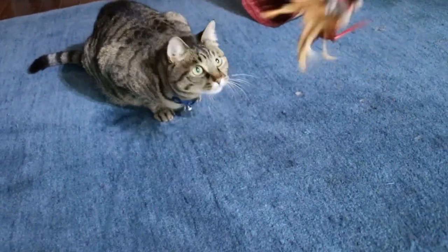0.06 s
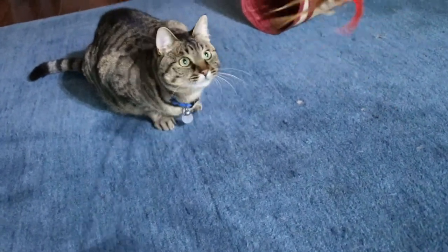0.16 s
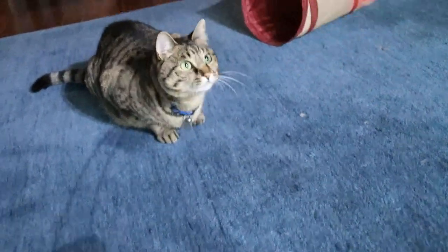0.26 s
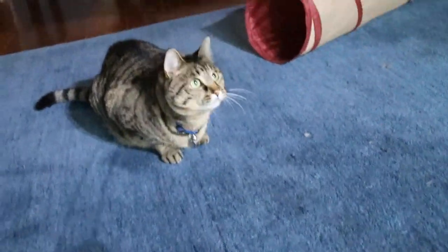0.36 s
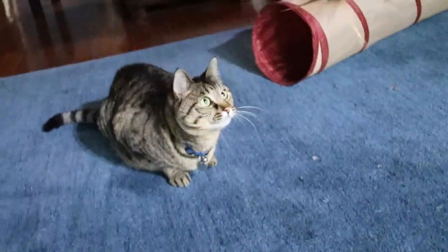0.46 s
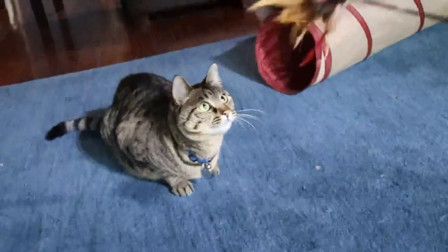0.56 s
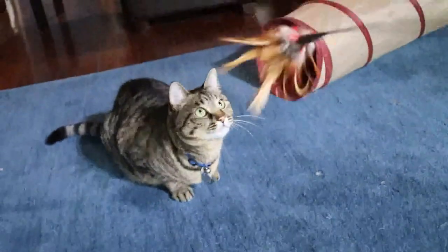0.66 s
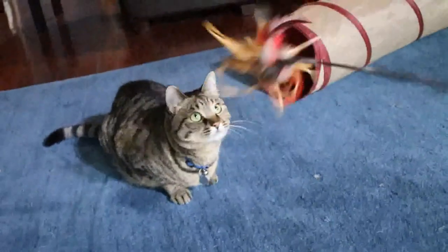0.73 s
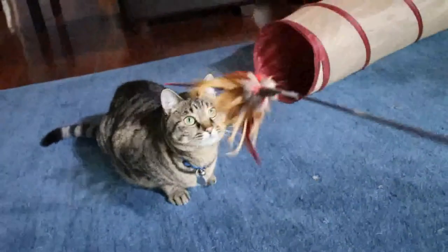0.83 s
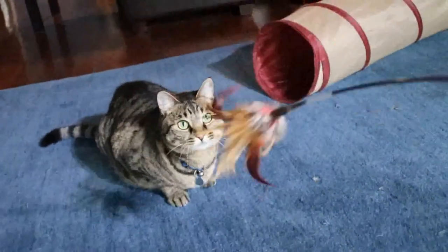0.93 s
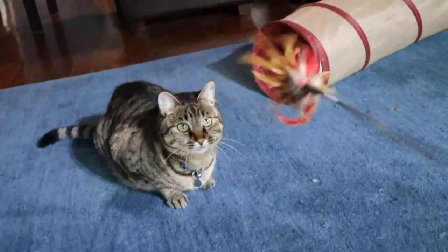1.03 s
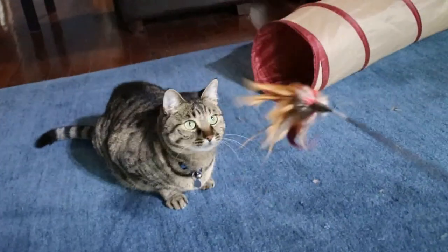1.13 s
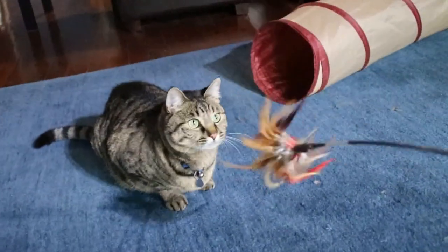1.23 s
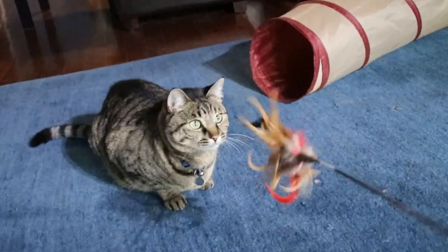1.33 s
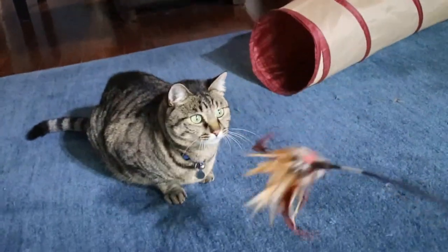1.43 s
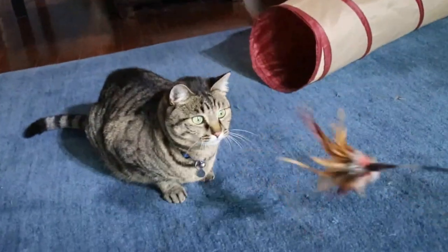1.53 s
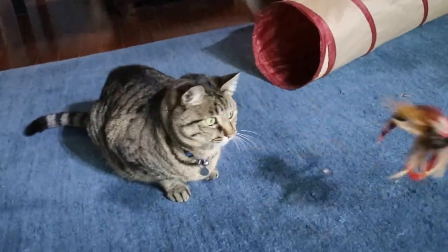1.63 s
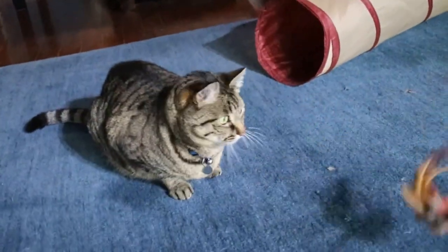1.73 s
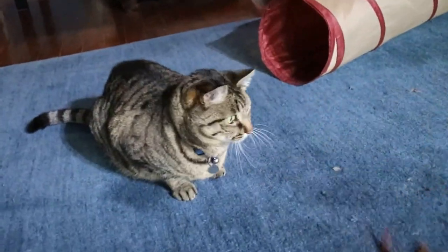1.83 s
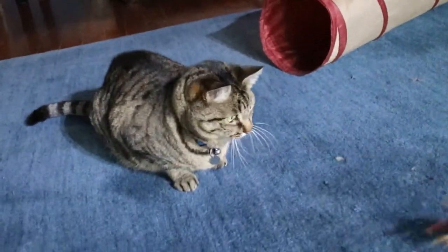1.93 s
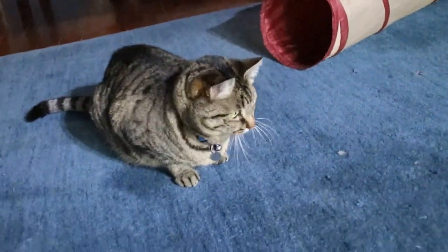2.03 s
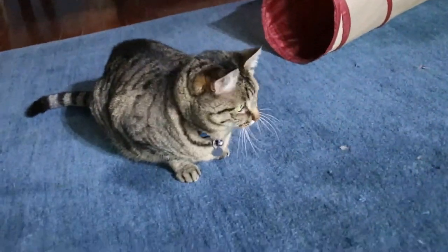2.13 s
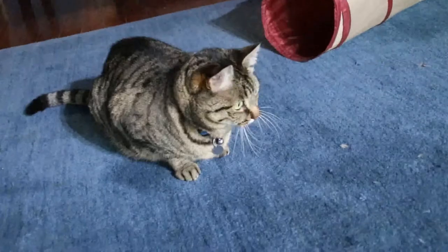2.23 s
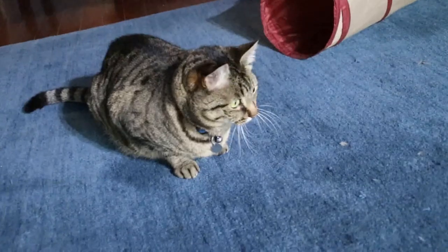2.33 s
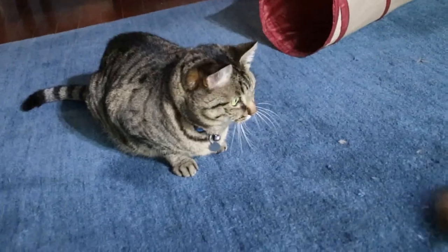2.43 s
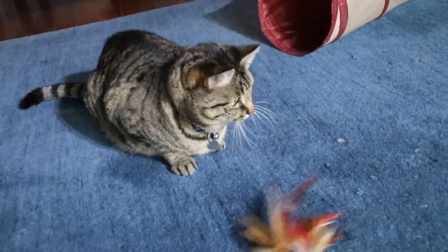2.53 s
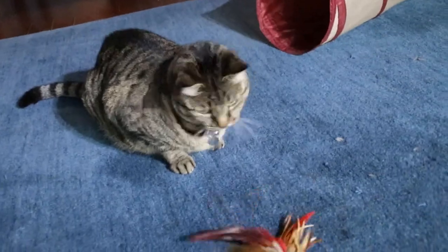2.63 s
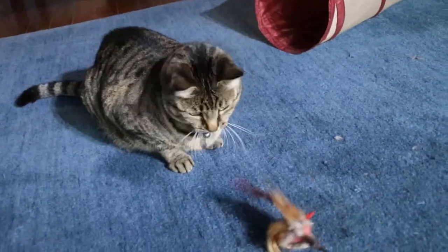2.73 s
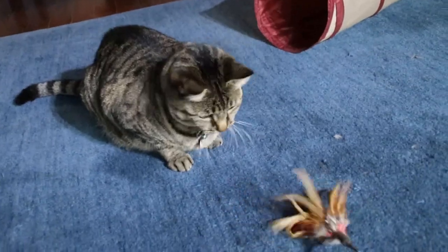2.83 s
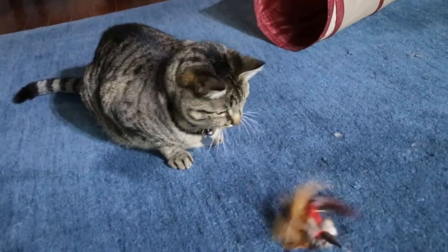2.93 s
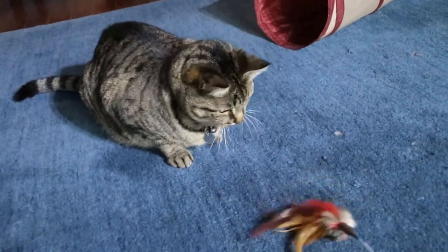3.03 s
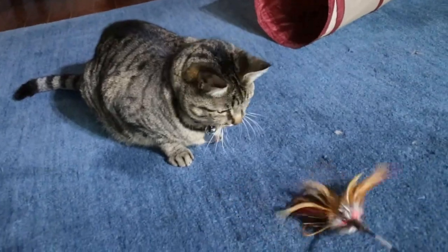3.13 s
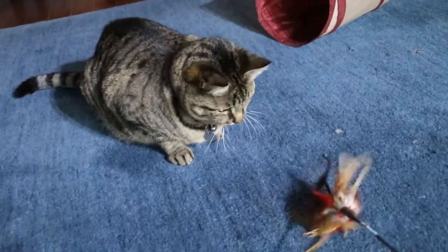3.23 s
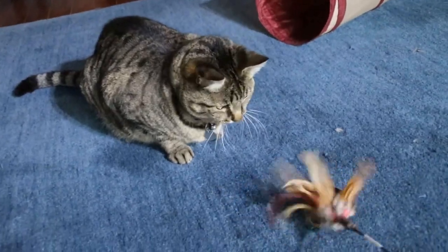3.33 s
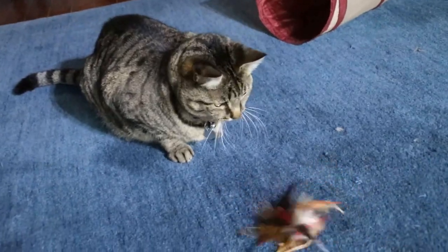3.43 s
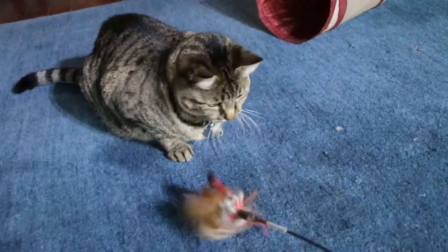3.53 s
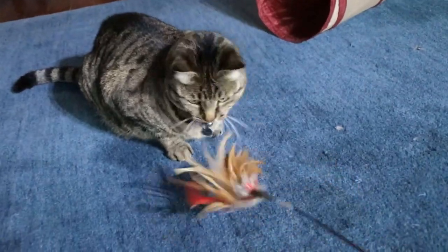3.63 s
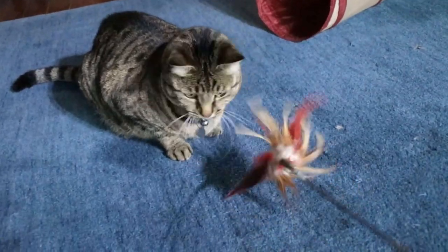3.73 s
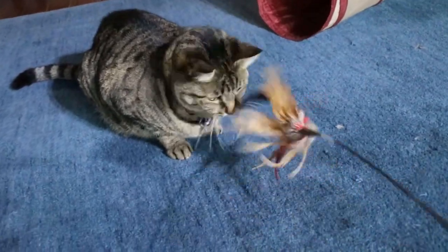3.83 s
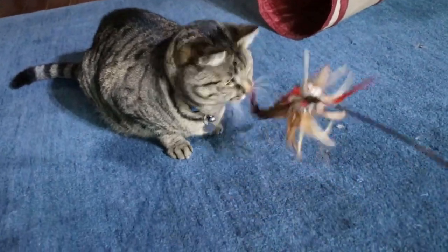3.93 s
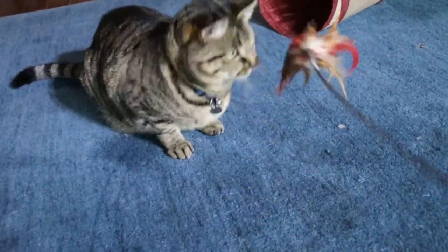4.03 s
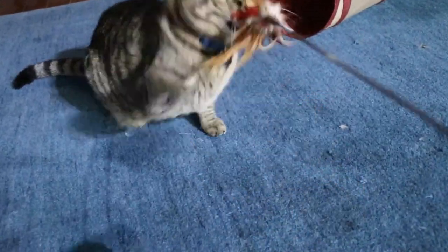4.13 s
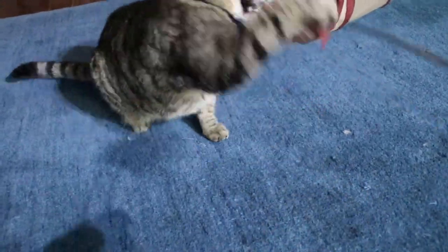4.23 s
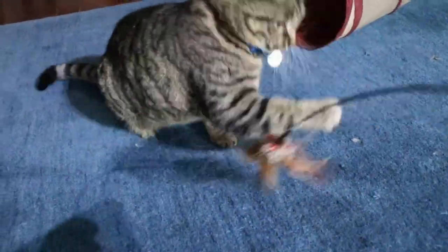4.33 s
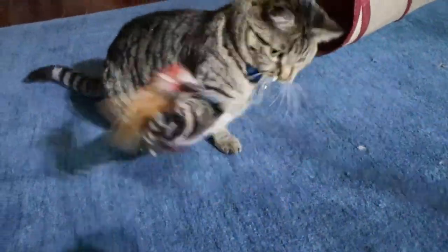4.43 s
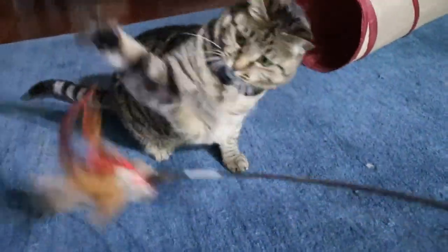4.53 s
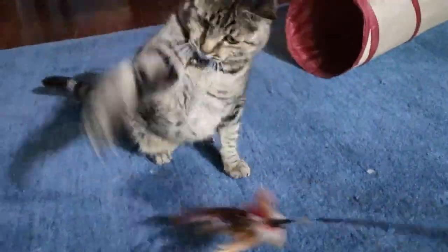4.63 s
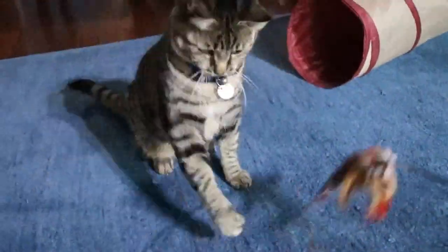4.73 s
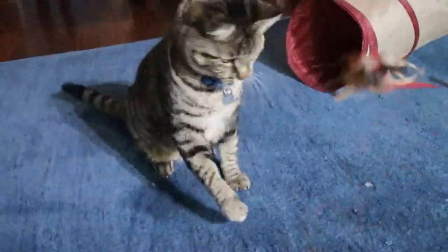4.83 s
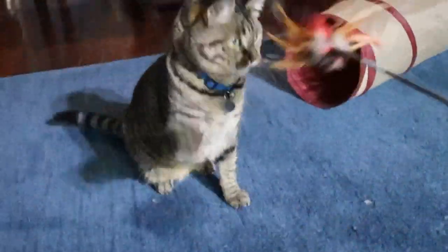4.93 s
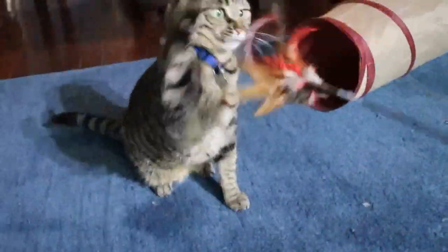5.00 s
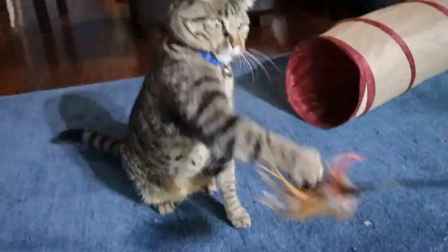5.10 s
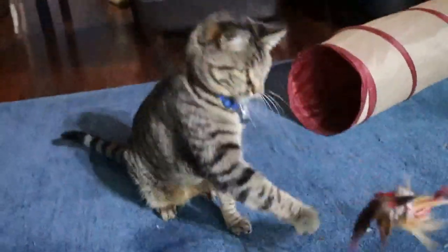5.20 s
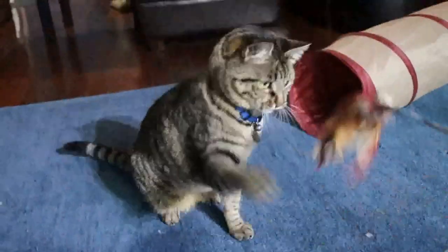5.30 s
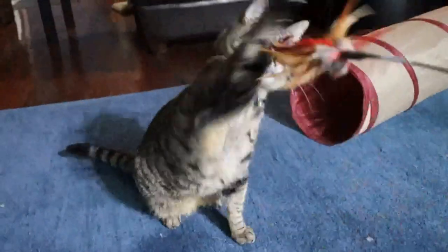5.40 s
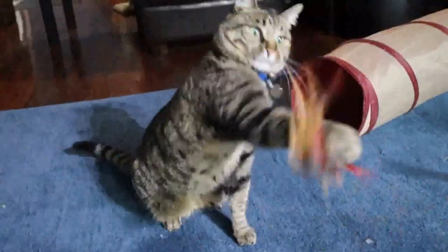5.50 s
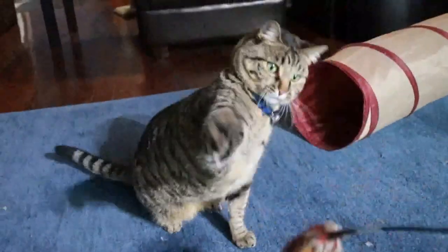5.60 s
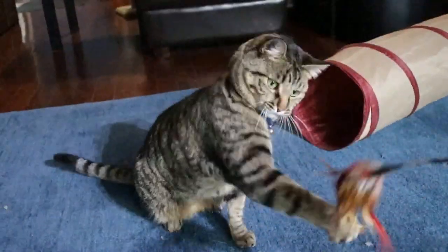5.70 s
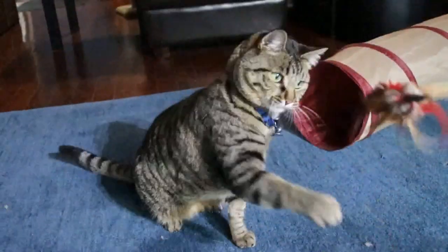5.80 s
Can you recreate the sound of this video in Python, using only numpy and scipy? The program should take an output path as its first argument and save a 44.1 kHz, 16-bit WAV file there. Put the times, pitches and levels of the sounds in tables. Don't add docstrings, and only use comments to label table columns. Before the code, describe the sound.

Camera-mounted stereo microphones catch faint room air and hiss. First a delicate, muffled pellet bell jingle, then two short gritty motor whirrs close to the microphone, with sharp clacks, separated by quiet. Airy feather flicks lead into energetic high metallic jingling, claw scratches and dry knocks as the cat lunges and swats, the bell slightly right, with another motor grind near the end.

```python
import sys
import numpy as np
from scipy import signal
from scipy.io import wavfile
from scipy.ndimage import uniform_filter1d

SR = 44100
rng = np.random.default_rng(int(sys.argv[2]) if len(sys.argv) > 2 else 0)


def ratio_of_db(decibels):
    return 10 ** (np.asarray(decibels, float) / 20)


def transcribe(signal):
    frames = np.atleast_2d(signal).T
    limited = np.clip(frames, -1, 1)
    pcm = np.round(limited * 32767).astype(np.int16)
    wavfile.write(sys.argv[1], SR, pcm)


N = 258426
T = np.arange(N) / SR


def noise(*shape):
    return rng.standard_normal(shape or N)


def evened(x):
    return x / np.sqrt(np.mean(x ** 2) + 1e-20)


def read(points, hz):
    f, value = np.transpose(points)
    return np.interp(np.log(hz + 1), np.log(f + 1), value)


def curve(tables, column, outside=-120.):
    out = np.full(N, outside)
    for rows in map(np.array, tables):
        inside = (T >= rows[0, 0]) & (T <= rows[-1, 0])
        out[inside] = np.interp(T[inside], rows[:, 0], rows[:, column])
    return out


def mode(x, hz, width):
    return signal.lfilter(*signal.iirpeak(hz, hz / width, SR), x)


def twice(x, hz, width, second_width):
    return mode(mode(x, hz, width), hz, second_width)


def band(x, lo_hz, hi_hz):
    return signal.sosfilt(signal.butter(3, [lo_hz, hi_hz], "band", fs=SR, output="sos"), x)


def puffs(s, db, decay_s):
    jumps = np.zeros(N)
    np.add.at(jumps, np.round(np.asarray(s) * SR).astype(int), ratio_of_db(db))
    return signal.lfilter([1], [1, -np.exp(-1 / (decay_s * SR))], jumps)


def bump(s, half_s):
    return np.exp(-((T - s) / half_s) ** 2)


def panned(x, pan_db):
    return x * ratio_of_db(np.array([pan_db / 2, -pan_db / 2]))


# frequency in Hz, level in dB per Hz.
AIR_COLOUR = [(15, -54), (25, -37), (48, 2.5), (87, -18), (128, -3), (208, -15.5), (245, -3.5), (510, -13),
              (584, -10.5), (902, -16), (1180, -14), (1320, -15.5), (3700, -19), (15200, -29.5),
              (16500, -74)]
# frequency in Hz, likeness from 0 to 1.
LIKENESS = [(60, 0.68), (180, 0.59), (550, 0.43), (1650, 0.045), (4970, 0.06), (15000, 0.052)]
# centre in Hz, width in Hz, level in dB.
DRONES = [(92, 10, -63.5), (185.1, 6.5, -68.5), (243.2, 26.5, -61.5), (344.8, 13, -69)]
# time in seconds, level in dB.
HUM_LEVEL = [
    (0.0, -66.5),
    (3.54, -66),
    (4.75, -49.5),
    (5.86, -62),
]


def air():
    frames, hz = N // 256 + 5, np.fft.rfftfreq(1024, 1 / SR)
    a, b, c, d = noise(frames, 513, 4).T
    left, other = a + 1j * b, c + 1j * d
    same = np.clip(read(LIKENESS, hz), -1, 1)[:, None]
    right = same * left + np.sqrt(1 - same ** 2) * other
    spectrum = np.array([left, right]) * ratio_of_db(read(AIR_COLOUR, hz))[:, None]
    wash = ratio_of_db(-53) * evened(signal.istft(spectrum, nperseg=1024, noverlap=768)[1][:, :N])
    drones = sum(ratio_of_db(db) * evened(twice(noise(), f, w, w)) for f, w, db in DRONES)
    hum = np.sqrt(2) * ratio_of_db(curve([HUM_LEVEL], column=1)) * np.sin(2 * np.pi * 119.3 * T)
    hum += ratio_of_db(-58.5) * np.sin(2 * np.pi * 60.0 * T)
    return wash + drones + hum


# time in seconds, main mode level
# in dB, time to ring down 60 dB in seconds, level of the high pair in dB relative to the main mode.
PELLET_STRIKES = [(0.004, -49, 0.091, -11), (0.064, -46, 0.039, -13), (0.128, -47, 0.071, -32),
                  (0.158, -37.5, 0.061, -23), (0.186, -58.5, 0.2, 12), (0.205, -39.5, 0.68, -12),
                  (0.226, -31, 0.038, -32), (0.247, -37, 0.09, -10), (0.267, -43, 0.056, -13),
                  (0.334, -47.5, 0.054, -36), (0.386, -46.5, 0.045, -41), (0.456, -35, 0.027, -15),
                  (0.467, -58, 0.028, -14), (0.502, -55, 0.06, -18), (0.526, -54, 0.072, -16),
                  (3.963, -52.5, 0.052, -11), (4.105, -44.5, 0.031, -9), (4.1404, -32, 0.014, -26),
         (4.182, -41.5, 0.52, -15), (4.206, -26.5, 0.8, -12), (4.216, -22.5, 0.073, -38),
         (4.235, -27.5, 0.7, -19), (4.267, -40.5, 0.8, -4), (4.29, -35, 0.2, -16), (4.325, -38, 0.49, -23),
         (4.351, -23, 0.027, -31), (4.355, -47, 0.8, -4), (4.372, -28, 0.65, -9), (4.3798, -17, 0.045, -27),
         (4.386, -64, 0.43, -8), (4.43, -23.5, 0.025, -28), (4.438, -60, 0.7, -8), (4.481, -30, 0.27, -5.5),
         (4.504, -24, 0.93, -16), (4.527, -27.5, 0.19, -12), (4.565, -32, 0.079, -37),
         (4.579, -40, 0.87, -28), (4.619, -26, 0.056, -25), (4.653, -29.5, 0.051, -25),
         (4.669, -65, 0.17, -20),
                  (4.691, -34, 0.032, -11), (4.699, -27, 0.05, -17), (4.7086, -15.5, 0.019, -31),
        (4.723, -32, 0.025, -17), (4.745, -63, 0.5, -19), (4.78, -38, 0.92, -23), (4.795, -68, 0.76, -13),
        (4.812, -43, 0.67, -9), (4.822, -24, 0.11, -15.5), (4.832, -60, 0.038, -19),
        (4.858, -27.5, 0.072, -37), (4.883, -43, 0.081, -33), (4.913, -53, 0.4, -31),
        (4.948, -41, 0.056, -10.5), (5.038, -40.5, 0.065, -32), (5.071, -32, 0.076, -6.5),
        (5.088, -30.5, 0.029, -35), (5.1, -57, 0.13, 8), (5.141, -20, 0.023, -27), (5.152, -26, 0.018, -28),
        (5.167, -51.5, 1, -15),
                  (5.263, -36, 0.3, -24), (5.282, -34, 0.67, -30), (5.301, -21.5, 0.052, -11.5),
        (5.331, -37, 0.13, -18), (5.374, -43, 0.18, -16), (5.449, -24.5, 0.029, -29),
        (5.466, -31, 0.051, -24), (5.513, -47.5, 1, -22), (5.573, -30.5, 0.074, -31),
        (5.603, -31, 0.048, -12), (5.611, -30, 0.12, -23), (5.655, -15, 0.16, -17.5),
        (5.702, -32.5, 0.3, -9), (5.736, -29, 0.083, -16), (5.771, -30.5, 0.15, -35),
        (5.778, -65, 0.081, -13), (5.8, -37, 0.031, -28), (5.829, -46.5, 0.23, -22)]
STRIKES = PELLET_STRIKES
# time in seconds, twin mode in relative dB, top mode in relative dB.
FACING = [(0.3, -17, -30), (4.101, -3, -28), (4.24, -22, -27), (4.34, -11, -24), (4.482, -5, -28),
          (4.519, -16, -26), (4.6, -9, -47), (4.69, -9, -26), (4.8, -28, -24), (4.95, 3.5, -34),
          (5.07, -19, -19), (5.16, -16, -19), (5.3, -14, -17), (5.47, -9, -13), (5.66, -8.5, -27),
          (5.71, -0.5, -23), (5.86, -10, -24)]
# time in seconds, left-right level in dB, left lead in radians.
BELL_SIDE = [
    (0.0, -3, -0.54),
    (5.07, -4.5, -0.41),
    (5.86, -9.5, -0.66),
]


def bell_ring():
    s, db, t60, high_db = np.transpose(STRIKES)
    turn_s, twin_db, top_db = np.transpose(FACING)
    softness_db = -24 - db
    twin_db = np.interp(s, turn_s, twin_db) + 0.15 * softness_db
    top_db = np.interp(s, turn_s, top_db) + 0.1 * softness_db
    now = np.maximum(np.searchsorted(s, T) - 1, 0)
    age = T - s[now]
    low_t60 = np.clip(t60[now], 0.02, 2)
    high_t60 = np.clip(low_t60, 0.11, 0.3)
    top_t60 = 0.55 * high_t60
    main_hz = 4868
    # (Hz, level in dB, ring time in s)
    modes = [(main_hz, db, low_t60),
             (5075, db + twin_db, 0.67 * low_t60),
             (11700, db + high_db - 0.5, high_t60),
             (11830, db + high_db - 7, high_t60),
             (12960, db + top_db, top_t60),
             (12060, db + top_db - 8, top_t60)]
    phase_luck, pitch_luck, height_luck = rng.uniform(-1.1, 1, (len(s), 18)).T.reshape(3, 6, len(s))
    lead = curve([BELL_SIDE], column=2, outside=0.) * np.array([[0.5], [-0.5]])
    out = np.zeros((2, N))
    for k, (hz, mode_db, ring_s) in enumerate(modes):
        spread_db = 6 * height_luck[k] if k > 2 else 0
        height = (age > 0) * ratio_of_db((mode_db + spread_db)[now] - 60 * age / ring_s)
        height = height * np.exp(1j * np.cumsum(phase_luck[k])[now])
        height = signal.lfilter([0.07], [1, 0.07 - 1], height)
        height *= ratio_of_db(0.9 * evened(band(noise(), 20, 150)))
        detune = 0.0022 if k == 0 else 0.004
        turn = 2 * np.pi * np.cumsum(hz * (1 + detune * pitch_luck[k][now])) / SR
        out += (height * np.exp(1j * (turn + lead * hz / main_hz))).real
    return out


# start in seconds, level in dB, settling time in seconds.
ROLLS = [(0.0618, -42, 0.015), (0.159, -45, 0.042), (0.2046, -47, 0.024), (0.246, -39.5, 0.019),
         (0.4545, -54, 0.051), (4.139, -42.5, 0.042), (4.1804, -38, 0.03), (4.231, -39, 0.043),
         (4.349, -38.5, 0.035), (4.38, -32, 0.031), (4.4283, -59, 0.025), (4.4817, -27, 0.05),
         (4.5654, -34, 0.034), (4.5964, -22, 0.012), (4.6505, -51, 0.017), (4.69, -34, 0.039),
         (4.72, -28, 0.0055), (4.8114, -37, 0.012), (4.8584, -44, 0.022), (4.944, -35.5, 0.038),
         (5.066, -30, 0.0098), (5.1406, -37, 0.042), (5.2995, -29, 0.011), (5.4477, -41.5, 0.072),
         (5.612, -31, 0.0087), (5.652, -24.5, 0.022), (5.706, -30, 0.024), (5.7338, -44, 0.057)]
# centre in Hz, width in Hz, level in dB.
SLOT = [(5780, 460, -4), (6120, 260, 4), (6210, 150, -7), (6670, 280, 0), (6370, 1180, -5),
        (8460, 1540, -23.5)]


def pellet_rattle():
    hits = rng.random(N) < 900 / SR
    taps = hits * ratio_of_db(3 * np.minimum(rng.exponential(1, N), 4)) * rng.choice([-1, 1], N)
    taps = evened(taps) * sum(puffs([at], db - 4.0, settle_s) for at, db, settle_s in ROLLS)
    s, db, _, high_db = np.transpose(STRIKES)
    push = ratio_of_db(5.5) * taps + puffs(s, db + 10.0, 0.00018) * noise()
    ping = sum((-1) ** k * ratio_of_db(slot_db) * twice(push, hz, width, 2 * width)
               for k, (hz, width, slot_db) in enumerate(SLOT))
    tickle = ratio_of_db(16.) * twice(taps, 4868, 80, 250) + ratio_of_db(13.) * twice(taps, 5075, 100, 250)
    click = ratio_of_db(11.0) * band(puffs(s, db + high_db, 0.00019) * noise(), 7500, 13600)
    return ping + tickle + click


def bell():
    out = band(bell_ring() + pellet_rattle(), 4550, 15000)
    return panned(out, curve([BELL_SIDE], column=1, outside=0.))


# time in seconds, level in dB, centre in Hz, treble in relative dB, left-right level in dB.
KNOCKS = [(0.062, -36.5, 455, -19, -4), (0.806, -26, 750, -11, -9), (1.515, -38.5, 330, -23, -1),
          (2.807, -11.5, 2720, -25, -5), (4.38, -26, 1010, -16, -12), (4.3799, -20, 910, -30, -4),
          (4.38, -18, 3800, -30, -4), (4.429, -26.5, 3760, -34, 12), (4.4295, -34, 1500, -30, -7),
          (4.483, -28, 2680, -26, -2), (4.7083, -23, 1630, -37, -12), (4.7089, -24, 550, -35, -6),
          (4.7088, -29, 3650, -35, -4), (4.86, -31, 3140, -21, -3), (4.953, -33.5, 463, -17, -1),
          (5.14, -42.5, 560, -12, 31), (5.186, -24.5, 600, -39, -10.5), (5.276, -13, 3100, -15.5, 5),
          (5.655, -23.5, 448, -12, 17), (5.78, -27.5, 655, -30, 1)]


def knocks():
    out, t = np.zeros((2, N)), np.arange(1300) / SR
    echo_s = 0.00021
    for s, db, hz, treble_db, pan_db in KNOCKS:
        grit = noise(2, len(t)) * np.exp(-t / 0.0024)
        blow = np.sinc((t - 0.0002) * 16000)
        blow += 0.25 * np.sinc((t - 0.0002 - echo_s) * 16000) + 0.17 * grit[0]
        push = mode(blow, hz, 0.8 * hz) + 0.4 * band(blow, 58, 3640)
        crack = band(grit[1] * np.exp(-t / 0.0013), 7100, 9900)
        tap = push / abs(push).max() + ratio_of_db(treble_db + 10.0) * crack
        at = round(s * SR)
        out[:, at:at + len(t)] += panned(ratio_of_db(db) * tap[None].T, pan_db).T
    return out


# frequency in Hz, time to fall 60 dB in seconds.
ROOM_DECAY = [(500, 0.085), (5000, 0.23), (12000, 0.22)]


def room(x):
    taps = np.zeros((2, SR // 2))
    at = np.arange(160, SR // 2 - 20, 20) + rng.integers(0, 20, (2, (SR // 2 - 161) // 20))
    np.put_along_axis(taps, at, rng.choice([-1., 1.], at.shape), 1)
    hz, t, z = signal.stft(taps, SR, nperseg=256)
    tail = signal.istft(z * ratio_of_db(-60 * t / read(ROOM_DECAY, hz)[:, None]), SR, nperseg=256)[1]
    return signal.fftconvolve(x[None], tail / np.linalg.norm(tail[0]), axes=1)[:, :N]


def through(body, drive, own):
    shake = drive * (np.sqrt(1 - own) * noise() + np.sqrt(own) * noise(2, N))
    return sum((-1) ** k * ratio_of_db(np.array([[left_db], [right_db]])) * twice(shake, hz, width, width)
               for k, (hz, width, left_db, right_db) in enumerate(body))


# pitch in Hz, swell time in seconds, relative level in dB.
CASE_PINGS = [(3100, 0.0015, -1), (5020, 0.0011, -9)]


def tooth_pings(s, db):
    out, t = np.zeros(N), np.arange(700) / SR
    for at, tooth_db, luck in zip(s, db, rng.uniform(-1.5, 1, (len(s), 4))):
        for k, (hz, swell_s, rel_db) in enumerate(CASE_PINGS):
            pitch = hz * (1 + 0.027 * luck[k])
            ring = t / swell_s * np.exp(1 - t / swell_s) * np.sin(2 * np.pi * pitch * t)
            out[round(at * SR):][:len(t)] += ratio_of_db(tooth_db + rel_db + 2.5 * k * luck[2]) * ring
    return out


# start in seconds, stop in seconds, grind in dB at the start,
# grind in dB at the stop, drone in dB.
DRIVES = [
    (0.804, 1.123, -38.5, -36, -49.5),
    (2.814, 3.173, -38.5, -38.5, -46),
    (5.271, 5.629, -38, -37, -46.5),
]
# time in seconds, level in dB, treble in relative dB.
CATCHES = [(0.806, -31, -7), (0.8814, -29, -14), (0.894, -31.5, -14), (0.971, -39, -16),
           (1.072, -35.5, -11), (1.0833, -33, -16), (1.104, -37.5, 0), (1.1188, -38.5, -4),
           (2.808, -23, 4.5), (2.814, -36, -21), (2.8395, -36, 8.5), (2.8519, -25.5, -7), (2.971, -30, -5),
           (3.0640, -33, -8), (3.0799, -28, -24), (3.11, -38.5, 7.5), (5.2774, -19.5, 0.5),
           (5.443, -26, -3), (5.46, -30, -21), (5.5113, -39, -5), (5.5243, -46, -13), (5.546, -40, -3),
           (5.5768, -35, -14), (5.5892, -36.5, -6), (5.611, -27.5, 5.5)]
# time in seconds, level in dB.
TEETH = [(0.8203, -47), (0.831, -36), (0.84, -30), (0.8609, -29.5), (0.9044, -37), (0.9235, -30.5),
         (0.9407, -33), (0.957, -45), (0.9812, -30), (1.0005, -29.5), (1.0064, -37), (1.019, -32.5),
         (1.0455, -42), (2.8254, -32.5), (2.866, -32.5), (2.872, -43), (2.8836, -43), (2.898, -36),
         (2.9098, -31), (2.9244, -37), (2.938, -35), (2.9475, -31.5), (2.987, -47), (3.0006, -34),
         (3.0162, -32.5), (3.039, -34), (3.0514, -37.5), (3.0944, -41), (3.114, -42), (3.128, -35),
         (3.1387, -29.5), (3.1533, -38), (3.1669, -35), (3.1748, -31), (5.3158, -33.5), (5.3205, -33),
         (5.3326, -34), (5.344, -34), (5.3574, -47), (5.374, -36), (5.389, -35), (5.4065, -36), (5.42, -42),
         (5.4977, -51), (5.534, -45)]
# time in seconds, change of the grind in dB.
STALLS = [(1.059, -15), (1.1, -16), (5.434, -16), (5.491, -11), (5.565, -13), (5.603, -6)]
# centre in Hz, width in Hz, dB at left, dB at right.
BODY_LOW = [(90, 56, -28, 3), (145, 205, -25, -1.5), (304.6, 175, 3, 6.5), (540, 120, -31, -2.5),
            (774, 116, -3.5, 9.5)]
BODY_MID = [(1120, 1350, -15.5, -9.5), (1655, 264, -3.5, -5), (2080, 670, -15, -5), (2428, 97, -6, -29),
            (3100, 510, -10, 4), (4200, 1070, -6.5, -9), (5130, 710, -19, -3.5), (6400, 940, -10, -48)]
BODY_TOP = [(7640, 1770, -2, 1), (9680, 910, -4, -9), (10860, 1800, -15, -4.5), (12900, 2400, -13, -8)]


def motor():
    spin_up_s, coast_s, idle_db = 0.046, 0.0062, -39
    runs = [[(a, in_db, drone_db + idle_db),
             (a + spin_up_s, in_db, drone_db),
             (b, out_db, drone_db),
             (b + coast_s, out_db + idle_db, drone_db + idle_db)]
            for a, b, in_db, out_db, drone_db in DRIVES]
    grind_db = curve(runs, column=1) + sum(db * bump(s, 0.0096) for s, db in STALLS)
    grind = uniform_filter1d(ratio_of_db(grind_db), 100)
    grind *= ratio_of_db(3.5 * evened(band(noise(), 50, 300)))
    drone = uniform_filter1d(ratio_of_db(curve(runs, column=2)), 200)

    tooth_s, tooth_db = np.transpose(TEETH)
    tooth_treble_db = -14.5 + 3.0 * rng.uniform(-1, 1, len(TEETH))
    teeth = [tooth_s, tooth_db + 0.5, tooth_treble_db]
    s, db, treble_db = np.hstack([np.transpose(CATCHES), teeth])
    thuds = uniform_filter1d(puffs(s, db, 0.0032), 70, origin=34)

    mid = through(BODY_MID, ratio_of_db(6.0) * grind + ratio_of_db(10.0) * thuds, own=0.45)
    top = through(BODY_TOP, ratio_of_db(-8.0) * grind + ratio_of_db(8.0) * puffs(s, db + treble_db, 0.0023), own=0.89)
    low = through(BODY_LOW, ratio_of_db(11.5) * drone + ratio_of_db(6.5) * puffs(s, db, 0.0034), own=0.76)
    whirr = evened(mode(noise(), 289, 39)) + 0.88 * np.sin(2 * np.pi * 89 * T)
    whirr = ratio_of_db(np.array([[-11.], [-4.]])) * drone * whirr
    pings = ratio_of_db(np.array([[-11.], [5.]])) * tooth_pings(s - 0.0008, db)
    left, right = mid + top + low + whirr + pings
    return np.array([left, np.roll(right, 7)])


# middle in seconds, level in dB, half length in seconds.
RUSTLES = [
    (1.339, -58, 0.0089),
    (1.87, -58, .015),
    (2.365, -59, 0.048),
    (2.52, -65, 0.044),
    (4.193, -45, 0.0029),
    (4.23, -50, 0.019),
    (4.358, -34.5, 0.0028),
    (4.374, -43, 0.0027),
    (5.208, -51.5, 0.034),
]
# middle in seconds, level in dB, half length in seconds.
SWISHES = [
    (3.28, -54, 0.02),
    (3.387, -56, 0.021),
    (3.5, -52, 0.017),
    (3.6, -64, .01),
    (3.648, -59.5, 0.028),
    (3.763, -54.5, 0.022),
    (3.877, -59, 0.018),
    (3.965, -61, 0.017),
]


def swishes():
    fur = evened(band(noise(2, N), 2280, 3800))
    feathers = evened(band(noise(2, N), 5500, 15000))
    fur *= sum(ratio_of_db(db) * bump(s, half_s) for s, db, half_s in RUSTLES)
    feathers *= sum(ratio_of_db(db) * bump(s, half_s) for s, db, half_s in SWISHES)
    return fur + feathers


def scene():
    cat = bell() + knocks()
    return cat + ratio_of_db(-8.0) * room(cat.mean(0)) + swishes() + motor() + air()


def low_pass(x):
    return signal.sosfilt(signal.butter(12, 16460, fs=SR, output="sos"), x)


def record(dry):
    edge = signal.butter(8, 16000, fs=SR, output="sos")
    mix = signal.sosfilt(edge, dry)
    return low_pass(mix)


dry = scene()
out = record(dry)
transcribe(out)
```